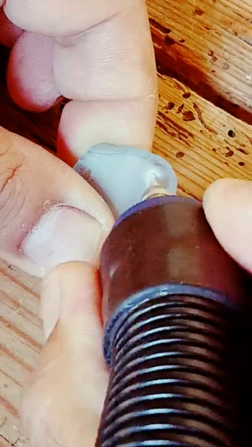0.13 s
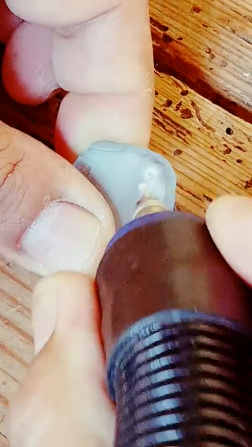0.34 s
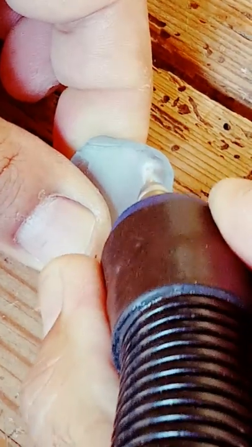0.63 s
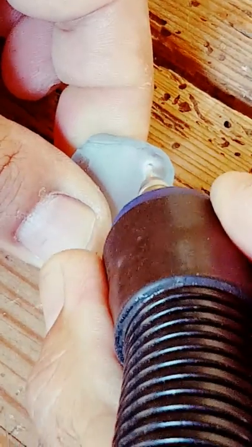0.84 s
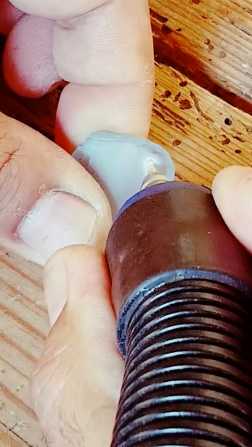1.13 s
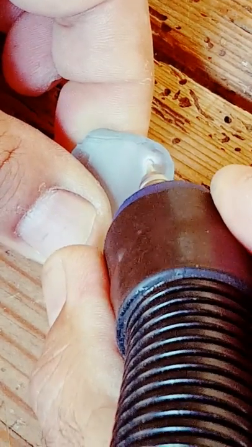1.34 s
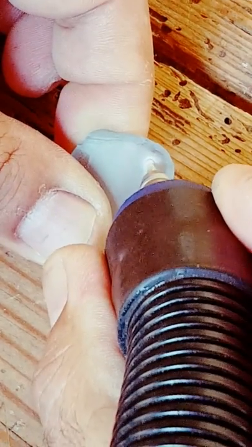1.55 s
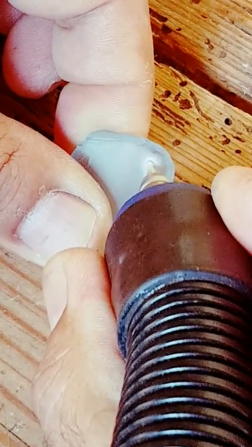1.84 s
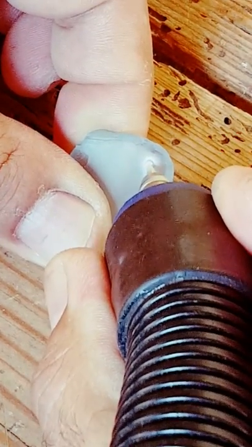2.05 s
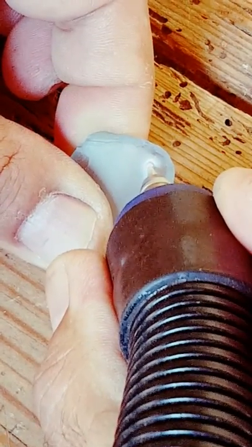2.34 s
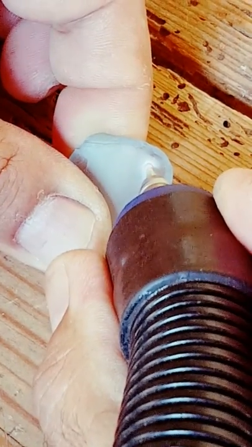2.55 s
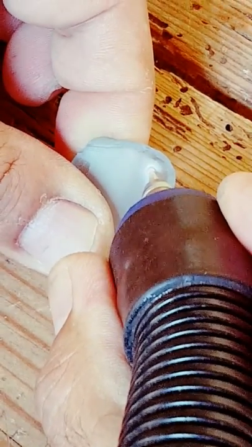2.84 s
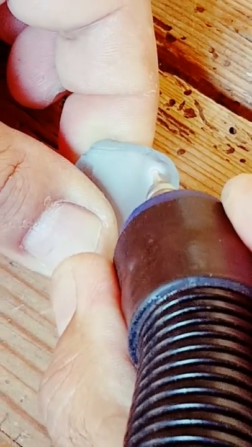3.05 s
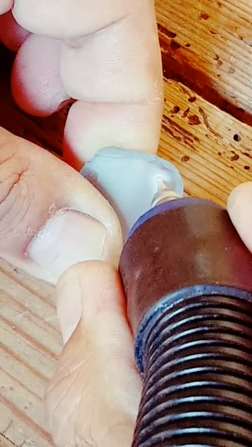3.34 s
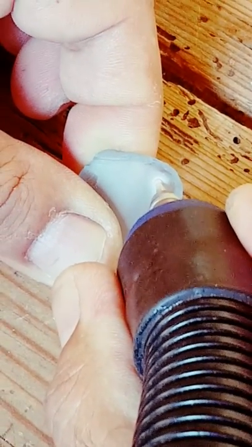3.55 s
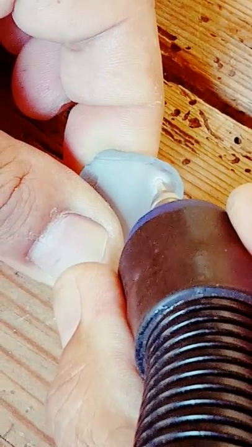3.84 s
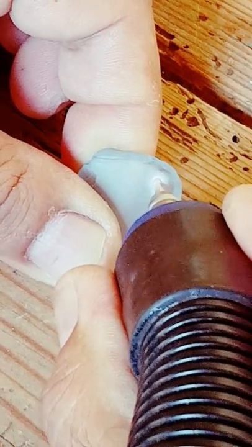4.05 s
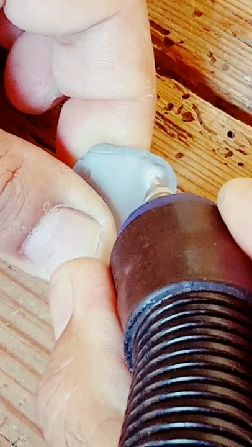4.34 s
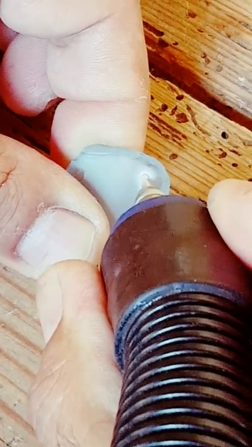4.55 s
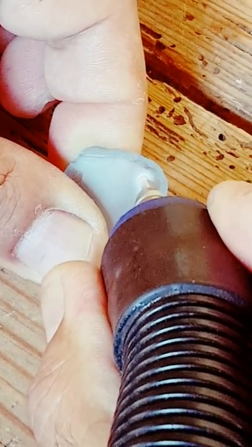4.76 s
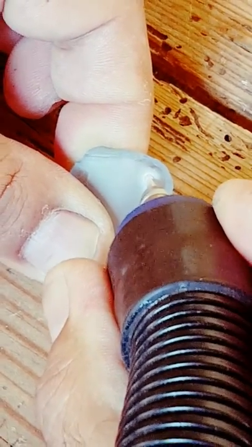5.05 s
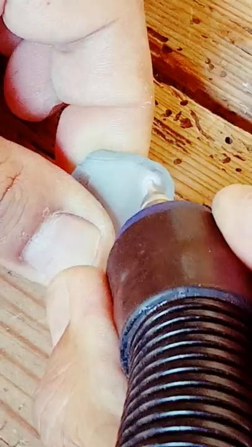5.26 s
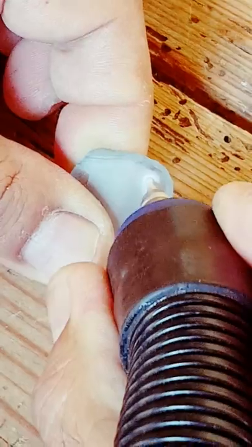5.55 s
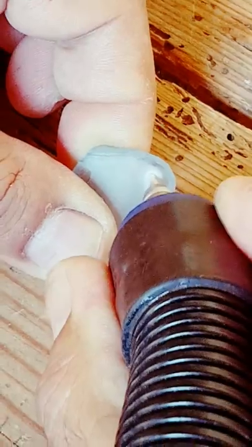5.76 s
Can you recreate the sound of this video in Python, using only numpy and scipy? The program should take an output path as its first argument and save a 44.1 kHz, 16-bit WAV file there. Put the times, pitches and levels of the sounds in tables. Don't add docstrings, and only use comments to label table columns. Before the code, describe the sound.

From 0 seconds a small air-turbine grinder is already at full speed, close to a two-port microphone in a workshop. A piercing, nearly pure whine at about 1.75 kHz carries a bright blade tone near 8.7 kHz and faint flickering overtones. Dense exhaust hiss, strongest in the high treble, spreads across both sides over a soft rush and low rumble; a faint steady motor hums near 600 Hz. Two small pitch sags open the sound, then it runs fairly evenly until 1.2. From there to about 3.2, light presses dip the pitch, with brief rougher lower undertones and tiny hollow chirps around 1.1 to 1.4 kHz, clearest near 1.7 to 1.8. Presses then deepen: a sharp drop near 3.75 almost stalls the burr and dulls the blade tone before quick recovery. Until 5.9 the whine keeps wavering slightly lower, leaning left, and ends without a spin-down.

```python
import sys
import numpy as np
from scipy import signal
from scipy.io import wavfile
from scipy.ndimage import uniform_filter1d

SR = 44100
rng = np.random.default_rng(int(sys.argv[2]) if len(sys.argv) > 2 else 0)


def elevation(decibels):
    levels = np.asarray(decibels, float)
    return 10 ** (levels / 20)


def materialize(psi):
    bounded = np.clip(np.atleast_2d(psi).T, -1, 1)
    quanta = np.round(bounded * 32767).astype(np.int16)
    wavfile.write(sys.argv[1], SR, quanta)


N = 260190
STALL_HZ = 1680
SETTLE_S = 0.2


def evened(x):
    return x / np.sqrt(np.mean(x ** 2) + 1e-20)


def read(points, hz):
    f, value = np.transpose(points)
    return np.interp(np.log(hz + 1), np.log(f + 1), value)


def curves(rows, t):
    s, *columns = np.transpose(rows)
    return [np.interp(t, s, column) for column in columns]


def drift(seconds):
    hop = 64
    chance = rng.standard_normal(N // hop + 2)
    span = max(round(seconds * SR / hop), 1)
    slow = evened(uniform_filter1d(uniform_filter1d(chance, span), span))
    return np.interp(np.arange(N) / hop, np.arange(len(slow)), slow)


def tone(phase, lag, left_db, right_db):
    left = elevation(left_db) * np.cos(phase)
    right = elevation(right_db) * np.cos(phase - lag)
    return np.sqrt(2) * np.array([left, right])


def presses(t):
    # moment in seconds, sag of the speed in Hz, onset length in seconds, extra shake of the shaft in dB
    press_rows = [(0.039, 47.0, 0.075, -2.1), (0.136, 32.0, 0.068, 2.0), (1.236, 22.0, 0.153, -0.3),
                  (1.71, 22.0, 0.155, -0.9), (1.82, 33.0, 0.061, 2.8), (2.065, 15.0, 0.127, -0.4),
                  (2.324, 20.0, 0.082, -0.3), (2.418, 14.0, 0.024, 2.1), (2.551, 28.0, 0.095, 0.3),
                  (2.681, 29.0, 0.029, 2.9), (2.841, 34.0, 0.118, 1.4), (2.952, 9.0, 0.019, 2.7),
                  (3.113, 35.0, 0.073, 2.0), (3.211, 11.0, 0.033, 2.7), (3.354, 24.0, 0.083, 0.9),
                  (3.491, 59.0, 0.039, 2.2), (3.598, 26.0, 0.072, 0.9), (3.756, 180.0, 0.033, 4.2),
                  (3.816, 51.0, 0.038, 0.3), (3.94, 52.0, 0.181, 1.5), (4.12, 37.0, 0.049, 2.7),
                  (4.406, 37.0, 0.137, 2.9), (4.555, 35.0, 0.04, 2.3), (4.815, 49.0, 0.145, 3.2),
                  (4.956, 43.0, 0.035, 1.3), (5.185, 50.0, 0.126, 2.4), (5.48, 30.0, 0.051, 0.2),
                  (5.599, 59.0, 0.084, 1.3), (5.841, 43.0, 0.061, 1.9)]
    recover, shake_early_s = 1.44, 0.02
    s, sag_hz, length, shake_db = np.transpose(press_rows)[:, :, None]

    def bell(u):
        return np.exp(-np.where(u < 0, u, u / recover) ** 2)

    coarse = t[::64]
    sag = (sag_hz * bell((coarse - s) / length)).sum(0)
    shake = (shake_db * bell((coarse - s + shake_early_s) / length)).sum(0)
    return np.interp(t, coarse, sag), np.interp(t, coarse, shake)


def blades(t, hz, phase):
    # time in seconds, bench echo left and right in radians, right lag in radians
    path_rows = [(0.0, 3.3, 1.3, -1.0), (0.25, 2.7, -0.3, 1.0), (0.6, 2.5, 3.0, 4.4), (1.0, 2.3, 2.0, 5.1),
                 (1.3, 2.9, -2.0, 6.7), (1.7, 2.7, 0.4, 6.5), (2.2, 3.1, 1.1, 6.6), (2.7, 3.9, -0.2, 6.9),
                 (3.1, 3.4, 0.9, 6.0), (3.45, 3.0, 1.8, 6.2), (3.8, 3.6, -0.6, 5.7), (4.25, 3.1, 1.5, 6.1),
                 (4.7, 3.6, 1.2, 6.5), (5.1, 3.6, 0.5, 6.7), (5.5, 3.6, 1.0, 6.3), (5.9, 3.7, 0.4, 6.6)]
    echo_s, echo_share_l, echo_share_r, right_later_s = 0.00125, 0.47, 0.63, 0.00172
    echo_l, echo_r, lag = curves(path_rows, t)
    turn_per_s = 2 * np.pi * 5 * (hz - 1720)
    stall = np.maximum(STALL_HZ - hz, 0)

    def comb(share, rad):
        return 20 * np.log10(abs(1 + share * np.exp(1j * (turn_per_s * echo_s + rad))))

    left_db = -16.5 + 2 * t / t[-1] + comb(echo_share_l, echo_l) - 0.031 * stall
    right_db = -28 + 2.2 * t / t[-1] + comb(echo_share_r, echo_r) - 0.19 * stall
    right_db = right_db + 4.5 * np.exp(-(t / SETTLE_S) ** 2)
    lag = lag + 1.08 + turn_per_s * right_later_s
    return tone(5 * phase, lag, left_db + 0.69 * drift(0.01), right_db + 1.7 * drift(0.015))


def weak_orders(t, phase, stall):
    # multiple of the shaft, left level in dB at the start and the end,
    # right level in dB at the start and the end, right lag in radians at the start and the end
    order_rows = [(3, -35.5, -43.5, -39, -39.5, -1.9, -.9), (4, -36, -37, -33, -42, -1, -3.8),
                  (6, -34, -40, -46, -51, 1.8, 0), (7, -37, -45, -41, -46, 1.3, -2.6),
                  (8, -45, -37, -48, -50, 3, .5), (9, -37, -35, -45, -44, 0, -2.3)]
    out = np.zeros((2, N))
    for k, *ends in order_rows:
        left_db, right_db, lag = (a + (b - a) * t / t[-1] for a, b in np.reshape(ends, (3, 2)))
        slip = 0.07 * k * drift(0.2)
        left_db = left_db - 0.14 * stall + 2.2 * drift(0.028)
        right_db = right_db - 0.14 * stall + 2.2 * drift(0.028)
        out += tone(k * phase, lag + slip, left_db, right_db)
    return out


def skips(t, phase):
    # start in seconds, length in seconds, half order in dB, one-and-a-half order in dB
    skip_rows = [(1.156, 0.11, -37, -36), (1.684, .13, -34.5, -30), (2.013, 0.093, -39, -38),
                 (2.57, .06, -46, -44), (3.165, 0.061, -48, -42), (3.38, 0.1, -40, -38),
                 (5.77, 0.1, -40, -45)]
    out = np.zeros((2, N))
    for s, length, half_db, third_db in skip_rows:
        at = slice(round(s * SR), round((s + length) * SR))
        gate = np.clip(np.minimum(t[at] - s, s + length - t[at]) / 0.032, 0, 1)
        out[:, at] += gate * tone(phase[at] / 2, 0.15, half_db, half_db)
        out[:, at] += gate * tone(3 * phase[at] / 2, 1.9, third_db, third_db - 2)
    return out


def turbine():
    # time in seconds, speed in Hz
    free_speed = [(0, 1758), (1, 1764), (5.9, 1745)]
    # time in seconds, left level in dB, right level in dB
    hand_rows = [(0.0, -14, -17.1), (0.25, -18.5, -17.6), (0.6, -19.5, -18), (1.0, -19.5, -19),
                 (1.3, -16, -17), (1.7, -17.8, -17.5), (2.2, -15.5, -18.5), (2.7, -20.5, -23),
                 (3.1, -19.5, -25.5), (3.45, -18, -24), (3.8, -20.5, -24.5), (4.25, -20.5, -26),
                 (4.7, -19.5, -24.2), (5.1, -17.5, -22), (5.5, -17.7, -21.7), (5.9, -18, -21.8)]
    # shaft speed in Hz, level in dB
    second_curve = [(1600, -40), (1680, -38), (1703, -33), (1722, -35), (1745, -39), (1764, -44)]
    t = np.arange(N) / SR
    sag_hz, shake_db = presses(t)
    hz = curves(free_speed, t)[0] - sag_hz + 2.12 * drift(0.012)
    phase = 2 * np.pi * np.cumsum(hz) / SR
    stall = np.maximum(STALL_HZ - hz, 0)

    shaft_l, shaft_r = curves(hand_rows, t)
    flutter_db = 0.95 * drift(0.032)
    left_db = shaft_l + shake_db + flutter_db - 0.02 * stall
    right_db = shaft_r + 1.2 * shake_db + flutter_db + 0.054 * stall
    out = tone(phase, 1.977, left_db, right_db)
    out += blades(t, hz, phase)

    second_db = read(second_curve, hz) + 2.6 * drift(0.04)
    second_lag = np.pi + 0.9 * np.exp(-(t / SETTLE_S) ** 2) + 0.25 * drift(0.1)
    out += tone(2 * phase, second_lag, second_db, second_db - 0.6 + 0.5 * drift(0.04))
    return out + weak_orders(t, phase, stall) + skips(t, phase)


def air():
    # time in seconds, exhaust in dB, workshop rumble in dB
    swell_rows = [(0, 0.8, 0), (.7, -0.6, 1), (1.2, 0, -2), (2.2, -0.8, 0.5), (2.6, -1.1, 3.5),
                  (3.2, -0.3, -2), (3.9, -2.4, -1.3), (4.3, -2.5, -1.3), (5.2, -0.7, 0), (5.9, -1.1, -0.5)]
    # frequency in Hz, level in dB per Hz
    colour = [(25, -65), (60, -5.5), (110, -0.5), (220, 3.5), (700, -1.43), (1500, -1.5), (2900, -7.5),
              (4500, -7), (5700, -13), (6400, -7), (7400, -2.5), (10000, -2.5), (12000, -3), (15700, -0.5)]
    # frequency in Hz, width in Hz, left gain in dB, right gain in dB
    housing = [(2370, 150, 1.5, 3), (6580, 730, 5, 1.5), (8050, 150, 3.5, -15), (8475, 520, 9, 9),
               (9320, 350, 4.5, 1.5), (10150, 220, -4, -5), (10590, 410, 6.5, 1), (12300, 680, -0.5, 4),
               (13200, 700, 3, -4.5), (1380, 190, -4.5, 0.5)]
    # frequency in Hz, loss in dB
    right_down = [(60, 12.5), (200, 3), (600, 10), (1200, 0), (2200, -0.5), (3000, 3), (4300, 6),
                  (7000, 1.5), (9500, 6.5), (11500, 5), (15500, 5)]
    # frequency in Hz, likeness of the two ports from 0 to 1
    likeness = [(60, 0.4), (300, 0.17), (1000, 0.6), (2200, 0.09), (5000, 0.23), (6300, 0.6), (8000, 0),
                (9300, 0), (10300, 0.4), (11700, 0.86), (13700, 0.3), (15300, .55)]
    # frequency in Hz, phase in radians by which the left port leads
    lead_curve = [(0, 1.5), (1120, -0.96), (1810, 2.5), (3360, 10.5), (5250, 10.5), (6290, 14), (6800, 19),
                  (8700, 26), (9390, 23), (11400, 39.5), (12200, 44), (14500, 48.0), (15300, 55),
                  (16700, 54)]
    hop, count = 256, N // 256 + 5
    hz = np.fft.rfftfreq(1024, 1 / SR)
    a, b, c, d, patches = rng.standard_normal((count, 513, 5)).T
    patches = evened(uniform_filter1d(uniform_filter1d(patches, 12, 0), 16, 1))

    hiss_l, rumble_db = curves(swell_rows, np.arange(count) * hop / SR - 0.012)
    rush_db, hiss_r = 0.7 * hiss_l, 0.85 * hiss_l
    blade_db = 1.0 * hiss_l
    high = np.clip(np.log2(hz / 1500 + 1e-9), 0, 1)[:, None]
    low = np.clip(np.log2(400 / (hz + 1)), 0, 1)[:, None]
    bladed = np.exp(-((hz[:, None] - 8600) / 1200) ** 2)
    under_db = (1 - high) * (low * rumble_db + (1 - low) * rush_db)
    left_db = under_db + high * (bladed * blade_db + (1 - bladed) * hiss_l)
    level_db = np.array([left_db, under_db + high * hiss_r])

    ports_db = read(colour, hz) - np.array([[0], [1]]) * read(right_down, hz)
    for f, width_hz, l_db, r_db in housing:
        ports_db = ports_db + np.exp(-((hz - f) / width_hz) ** 2) * np.array([[l_db], [r_db]])

    same = np.clip(read(likeness, hz), 0, 1)[:, None]
    lead = np.interp(hz, *np.transpose(lead_curve))[:, None]
    left = a + 1j * b
    right = np.exp(-1j * lead) * same * left + np.sqrt(1 - same ** 2) * (c + 1j * d)
    patch_db = (1.22 + 1.5 * np.exp(-((hz[:, None] - 4500) / 1900) ** 2)) * patches
    spectrum = np.array([left, right]) * elevation(ports_db[:, :, None] + level_db + patch_db)
    noise = signal.istft(spectrum, nperseg=1024, noverlap=768)[1][:, :N]
    return elevation(-18) * evened(noise)


def workshop():
    # multiple, left level in dB, right level in dB, right lag in radians
    hum_rows = [(1, -45, -42, 0.69), (4, -62, -44.5, 0.77), (7, -36, -53, 3)]
    phase = 2 * np.pi * 608.35 * np.arange(N) / SR
    out = np.zeros((2, N))
    for k, l_db, r_db, lag in hum_rows:
        out += tone(k * phase, lag, l_db + 0.43 * drift(0.027), r_db + 0.58 * drift(0.06))
    return out


def chatter():
    # start in seconds, level in dB, pitch in Hz, length in seconds
    chatter_rows = [(1.273, -29.5, 1098, 0.038), (1.698, -27, 1370, 0.029), (1.798, -21, 1160, 0.017),
                    (2.06, -27.5, 1147, 0.038), (2.322, -33, 1125, .035), (2.592, -34, 1090, .035),
                    (3.19, -38, 1085, .03)]
    out = np.zeros(N)
    for s, db, hz, length in chatter_rows:
        u = np.arange(0, 1, 1 / (length * SR))
        chirp = np.sin(np.pi * u) ** 2 * np.sin(2 * np.pi * hz * u * length)
        out[round(s * SR):][:len(u)] += np.sqrt(2) * elevation(db) * chirp
    return out * elevation(np.array([[-1.5], [1.5]]))


def scene():
    return turbine() + air() + workshop() + chatter()


def low_pass(x):
    return signal.sosfilt(signal.butter(12, 15730, fs=SR, output="sos"), x)


def record(dry):
    return low_pass(dry)


dry = scene()
out = record(dry)
materialize(out)
```